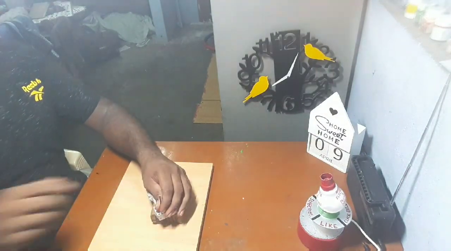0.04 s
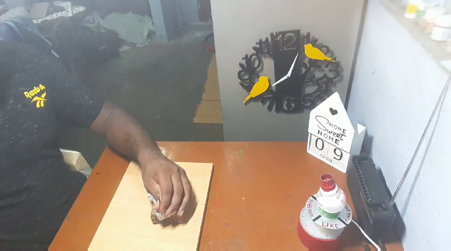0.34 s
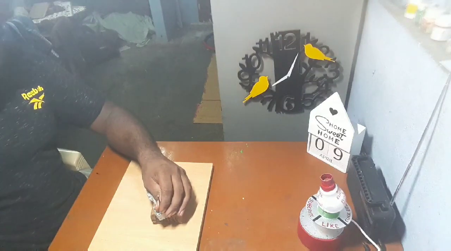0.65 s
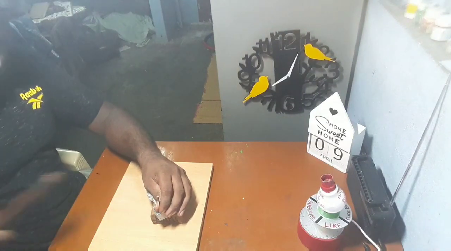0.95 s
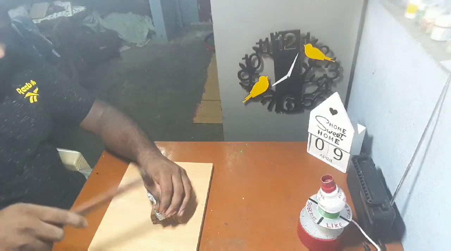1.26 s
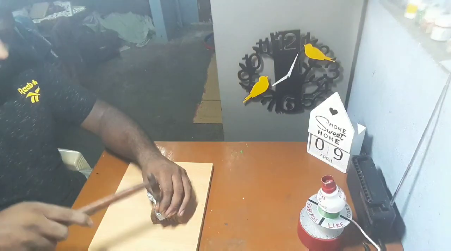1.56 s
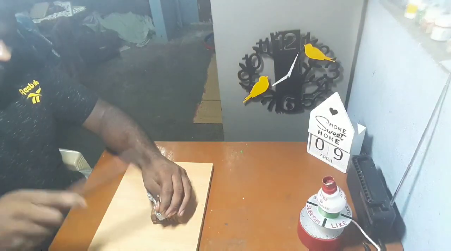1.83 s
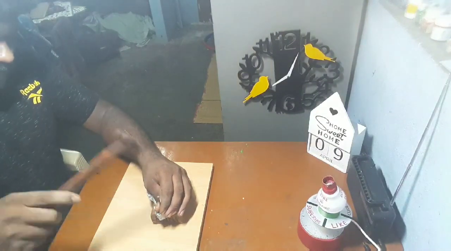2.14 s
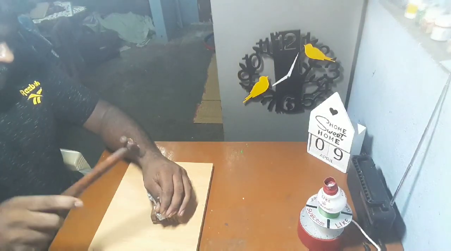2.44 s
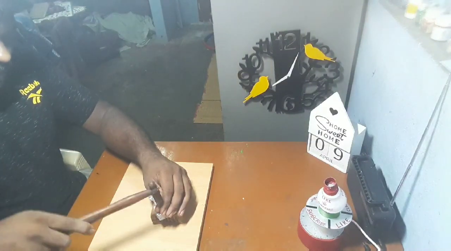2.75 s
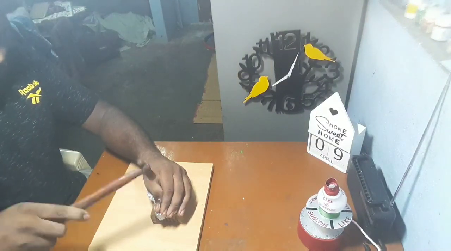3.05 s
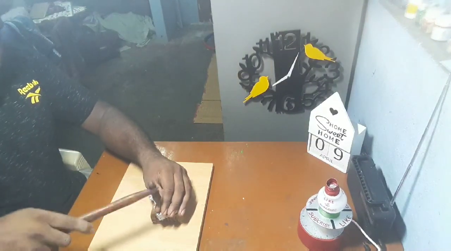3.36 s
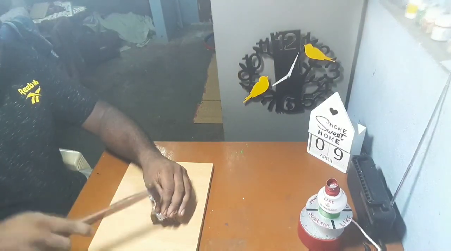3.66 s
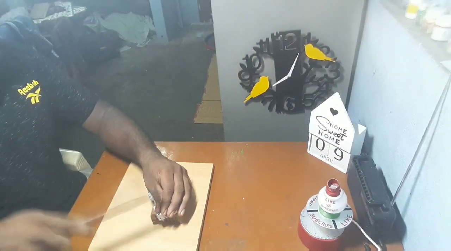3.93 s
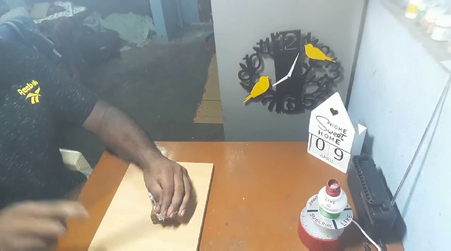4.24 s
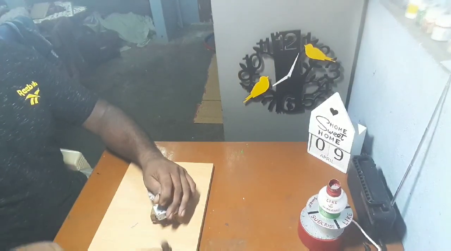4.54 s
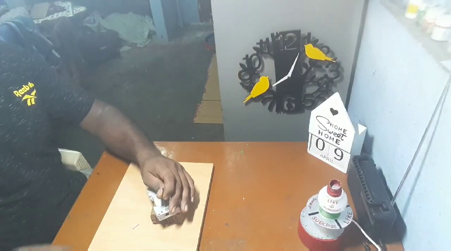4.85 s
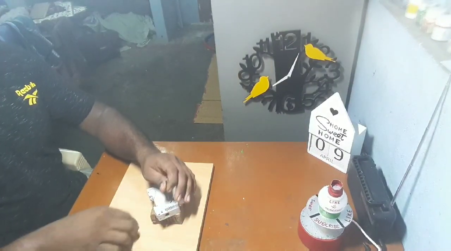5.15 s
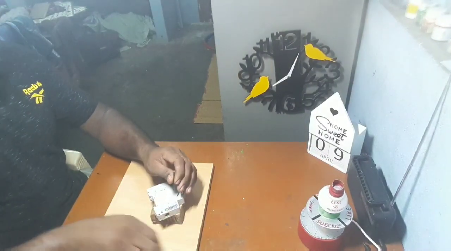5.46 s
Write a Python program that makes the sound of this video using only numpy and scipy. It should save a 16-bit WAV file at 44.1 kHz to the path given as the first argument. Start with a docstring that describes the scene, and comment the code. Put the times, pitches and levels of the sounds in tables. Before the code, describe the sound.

A fan hisses steadily with a faint hum in a small room. At about 0.8 seconds a far horn gives one very brief toot. From 1.9 to 4.3 seconds a tool handle knocks eleven times, about four a second, on a plastic circuit breaker held on a wooden board on a table. Each close blow is a sharp crack with a hollow ring, a small rattle of the insides, a low table thud and a short room echo. The last few hit a little harder and rattle more. The fan's hiss sinks as the knocks begin and stays low to the end. Around 5 seconds the breaker is laid over with three quick, dull bumps. From 5.2 to 5.3 seconds it judders across the board in tiny creaking scrapes, followed by a soft rub of hand and plastic on wood until about 5.6 seconds.

```python
"""A tool handle knocks eleven times on a plastic circuit breaker held on a board on a table.
Each blow cracks, rings the case, rattles its insides and thuds the table, and the small room echoes.
Then the breaker is laid over and judders across the board while the hand rubs along.
A fan hisses throughout, and a far horn toots once before the knocks. An automatic volume control
turns down at the knocks and stays down, so the fan's hiss sinks away."""
import sys
import numpy as np
from scipy import signal
from scipy.fft import rfft, irfft, next_fast_len
from scipy.io import wavfile
from scipy.ndimage import uniform_filter1d

SR = 44100
rng = np.random.default_rng(int(sys.argv[2]) if len(sys.argv) > 2 else 0)


def master_out(mix):
    """Clip the mix to full scale and print it as 16-bit PCM to the path in sys.argv[1]."""
    frames = np.transpose(np.atleast_2d(mix))
    ceiling = np.clip(frames, -1, 1)
    pcm = np.round(ceiling * 32767).astype(np.int16)
    wavfile.write(sys.argv[1], SR, pcm)


N = 250973
TIME = np.arange(N) / SR
AGE = TIME[:SR // 2]  # seconds since a contact, for sounds half a second long

# the tool's blows: (time [s], level [dB], spot [0 = stiff rim, 1 = hollow middle], bass boost [dB])
KNOCKS = [(1.878, -27.5, 0.76, -1.5), (2.1036, -23, 0.64, -1), (2.3571, -21.5, 0.049, 1.5),
          (2.6108, -23, 0.092, 0), (2.8535, -25.5, 0.36, 2), (3.075, -27, 0.63, 4.5),
          (3.2728, -24.5, 0.69, 2.5), (3.4713, -23, 0.78, 2), (3.6965, -20.5, 0.87, 2),
          (4.0138, -19, 0.53, 4), (4.2892, -20, 0.6, -5.5)]
# fingers clicking on the breaker, then the breaker being turned and laid down: (time [s], level [dB])
BUMP_EVENTS = [(4.763, -52), (4.85, -58), (4.885, -58), (4.975, -24.5), (5.068, -23), (5.0962, -24),
               (5.142, -44.5)]
# slips as it is pushed over the board: (time [s])
SLIP_TIMES = [5.2298, 5.2694, 5.2933, 5.318]
# the notes of the knocked case: (pitch [Hz], width [Hz], level [dB]); wider notes die sooner
CASE_NOTES = [(472, 330, 3), (743, 92, 8.5), (994, 27, 2), (1094, 74, 5), (1555, 92, 3), (1782, 132, 4.5),
              (2086, 170, -4.5), (2560, 120, -29), (3690, 260, -26), (7020, 1800, -13.5)]
# the notes of the board: (pitch [Hz], width [Hz], level [dB])
BOARD_NOTES = [(440, 580, 17.5), (650, 540, -11), (950, 33, 1), (1280, 370, 17), (2040, 86, 17),
               (2630, 460, -8), (2950, 300, -29), (3400, 250, -25), (5030, 200, -27)]
# the notes of the creaking case: (pitch [Hz], width [Hz], level [dB])
CREAK_NOTES = [(940, 107, 7), (1260, 54, -13), (1850, 190, 3), (2620, 53, 2.5), (2810, 180, -7),
               (3745, 120, 0), (4730, 180, -20.5), (5400, 140, -17.5), (7150, 130, -24)]
# the low notes of the table top: (pitch [Hz], level [dB], time to fade by 60 dB [s])
TABLE_NOTES = [(70.2, -7, 0.29), (99.4, 5, 0.17), (130.8, -13, 0.31), (178.6, -1, 0.15), (259, 0, 0.11),
               (292.5, -3.5, 0.15), (332, -14.5, .16), (422.4, -10, 0.13)]
# the tone of a bare, hard contact: (frequency [Hz], level [dB])
CRACK_TONE = [(60, -16.5), (250, 7), (500, 1), (780, 0), (1200, -3), (2100, -6), (3000, -10), (4000, -16.5),
              (5000, -19), (7000, -15.5), (8700, -38), (12500, -29), (15300, -46)]
# the case's halves and insides chattering: (frequency [Hz], level [dB])
CHATTER_TONE = [(300, -19), (1300, -1), (2200, 1.5), (3200, -6.5), (5000, -21), (6900, -9), (8700, -30),
                (15000, -28)]
# grit under the case's edges: (frequency [Hz], level [dB])
GRIT_TONE = [(100, -3), (600, 7), (1500, -1.5), (3000, -5.5), (5000, -14), (7000, -24), (10000, -22),
             (15000, -22)]
# the hand rubbing over the board: (frequency [Hz], level [dB])
RUB_TONE = [(30, -10), (90, 17), (400, 13), (1000, 8.5), (2500, -1), (7000, -68), (15000, -43.5)]
# the room's echo: (frequency [Hz], time to fade by 60 dB [s], level [dB])
ROOM_ECHO = [(80, 0.55, -19.5), (247, 0.29, -4), (600, 0.25, 8), (1470, 0.28, 0), (3500, .26, 1.5),
             (7100, 0.26, -1.5), (14000, 0.25, 0)]
# the rush of fan and room air: (frequency [Hz], level [dB])
AIR_TONE = [(15, -29), (25, 5.5), (55, -13), (92, -4.5), (141, -11.5), (285, -6), (344, -12), (416, -8),
            (489, -14), (575, -7), (988, -11), (1070, -11.5), (2990, -23), (11300, -57), (16000, -61)]
# the fan's faint hum: (pitch [Hz], level [dB])
FAN_NOTES = [(87, -47.5), (288, -49), (424, -71), (721, -67)]
# the far horn: (pitch [Hz], level [dB])
HORN_NOTES = [(385, -31.5), (527, -33)]


def gain(db):
    """Turn decibels into a number to multiply by."""
    return 10 ** (np.asarray(db) / 20)


def unit_energy(x):
    """Scale a short sound to an energy of one (amplitude squared times seconds)."""
    return x / np.sqrt(np.sum(x ** 2) / SR)


def fade(fade_s):
    """A curve that falls by 60 dB every fade_s seconds."""
    return np.exp(-np.log(1000) * AGE / fade_s)


def add(track, start_s, sound):
    """Mix a sound into the track."""
    i = int(start_s * SR)
    track[i:i + len(sound)] += sound[:N - i]


def colour(x, tone):
    """Filter a sound to follow a list of (frequency [Hz], level [dB]) points."""
    size = 2 * next_fast_len(len(x))
    hz, db = np.transpose(tone)
    curve = gain(np.interp(np.log(np.fft.rfftfreq(size, 1 / SR) + 1), np.log(hz), db))
    # folding the cepstrum keeps the filter from ringing before the sound starts
    cepstrum = irfft(np.log(curve))
    cepstrum[1:size // 2] *= 2
    cepstrum[size // 2 + 1:] = 0
    return irfft(rfft(x, size) * np.exp(rfft(cepstrum)))[:len(x)]


def soften(x, top_hz):
    """Cut the treble: a softer contact pushes for longer."""
    return signal.sosfilt(signal.butter(2, min(top_hz, SR / 2 - 1), fs=SR, output="sos"), x)


def wander(per_s):
    """A random drift, about one in size, that heads for a new value per_s times a second."""
    points = rng.standard_normal(int(N / SR * per_s) + 2)
    return np.interp(TIME * per_s, np.arange(len(points)), points) * np.sqrt(3 / 2)


def note(hz, db):
    """A pure tone that follows a changing pitch."""
    return gain(db) * np.sqrt(2) * np.sin(2 * np.pi * np.cumsum(hz) / SR)


def fan(air_db=-34.5, flutter_db=0.07, drift_hz=3, waver_db=4.4):
    """Rushing air that flutters slightly, with a few wavering tones."""
    air = colour(rng.standard_normal(N), AIR_TONE) * gain(flutter_db * wander(per_s=17))
    hum = sum(note(hz + drift_hz * wander(per_s=31), db) * gain(waver_db * wander(per_s=15))
              for hz, db in FAN_NOTES)
    return gain(air_db) * air / np.std(air) + hum


def horn(start_s=0.789, end_s=0.862, ramp_s=0.012):
    """One brief, wavering two-note toot from outside."""
    on_off = np.clip(np.minimum(TIME - start_s, end_s - TIME) / ramp_s, 0, 1)
    return on_off * sum(note(hz * (1 + .03 * wander(per_s=50)), db) for hz, db in HORN_NOTES)


def room(x, near_db=2, near_fade_s=0.043):
    """Quick echoes off the table, then the room's tail, drawn afresh for each sound."""
    hz, fade_s, db = np.transpose(ROOM_ECHO)
    freq = np.fft.rfftfreq(len(AGE), 1 / SR)
    build_up = np.minimum(AGE / .002, 1) ** 2
    echo = 0
    for centre_hz in 62.5 * 2 ** np.arange(9):
        octave = abs(np.log2(freq / centre_hz + 1e-9)) < .5
        noise = irfft(np.exp(2j * np.pi * rng.random(len(freq))) * octave, len(AGE))
        tail_s = np.interp(np.log(centre_hz), np.log(hz), fade_s)
        tail_db = np.interp(np.log(centre_hz), np.log(hz), db)
        tail = unit_energy(noise * build_up * (fade(tail_s) + gain(near_db) * fade(near_fade_s)))
        echo = echo + gain(tail_db) * tail * np.sqrt(octave.mean() / SR)
    return signal.fftconvolve(x, echo)[:len(x)]


def rub(start_s=5.334, rise_s=0.044, start_db=-41.5, swell_db_per_s=27):
    """Skin and plastic slide softly on wood, harder as the hand speeds up."""
    noise = colour(rng.standard_normal(N), RUB_TONE)
    age = np.maximum(TIME - start_s, 0)
    level_db = start_db + swell_db_per_s * age + wander(per_s=33)
    return noise / np.std(noise) * np.minimum(age / rise_s, 1) * gain(level_db)


def strengths(db):
    """Each contact shares its force among the notes a little differently; every other one is flipped."""
    return gain(db + rng.standard_normal(db.shape)) * (-1) ** np.arange(len(db))[:, None]


def ring(notes):
    """After one push, an object rings at its own notes, which die away."""
    hz, width, db = np.transpose(notes)[:, :, None]
    waves = width * strengths(db) * np.exp(-np.pi * width * AGE) * np.sin(2 * np.pi * hz * AGE)
    return unit_energy(waves.sum(axis=0))


def thud(rise_s=0.0052):
    """The table top takes a moment to swing up, then booms; the hand's weight shifts its notes a bit."""
    hz, db, fade_s = np.transpose(TABLE_NOTES)[:, :, None]
    hz = hz * (1 + .015 * rng.standard_normal(hz.shape))
    waves = strengths(db) * fade(fade_s) * np.sin(2 * np.pi * hz * AGE)
    return unit_energy(waves.sum(axis=0) * (1 - np.exp(-AGE / rise_s)))


def rattle(tone, fade_s):
    """A shower of tiny clicks as loose bits settle after a blow."""
    clicks = rng.standard_normal(len(AGE)) * (rng.random(len(AGE)) < .2)
    return unit_energy(colour(clicks * fade(fade_s), tone))


def crack():
    """The bare click of hard things meeting."""
    return unit_energy(colour(1. * (AGE == 0), CRACK_TONE))


def slips(first_db=-31, later_db=-38.5, scrape_s=0.0072, top_hz=4600):
    """Short scrapes make the case creak and nudge the board; the first breaks free and is loudest."""
    out = np.zeros(N)
    for k, start_s in enumerate(SLIP_TIMES):
        scrape = rng.standard_normal(len(AGE)) * np.clip(1.5 - AGE / scrape_s, 0, 1)
        ringing = signal.fftconvolve(scrape, ring(CREAK_NOTES))[:len(AGE)]
        creak = unit_energy(soften(ringing, top_hz))
        nudge = soften(gain(-8) * ring(BOARD_NOTES), top_hz) + gain(-13) * thud()
        add(out, start_s, gain(later_db if k else first_db) * (creak + nudge))
    return out


def bumps(heavy_top_hz=1960, db_per_octave=12):
    """Fingers click on the case, then its edges drop grittily on the board, which rings and passes the blow to
    the table."""
    out = np.zeros(N)
    heaviest_db = max(db for _, db in BUMP_EVENTS)
    for start_s, db in BUMP_EVENTS:
        # heavy drops land flat and dull; light finger clicks on the case sound brighter
        top_hz = heavy_top_hz * 2 ** ((heaviest_db - db) / db_per_octave)
        grit = gain(-3) * rattle(GRIT_TONE, fade_s=0.03)
        blow = gain(-2) * ring(BOARD_NOTES) + gain(-10) * crack() + grit + gain(-12) * thud()
        add(out, start_s, gain(db) * soften(blow, top_hz))
    return out


def knocks(loosen_db_per_s=2.5, echo_db=1):
    """The tool drives the case into the board. The blow echoes in the room; the rattle is added dry."""
    out = np.zeros(N)
    first_s = KNOCKS[0][0]
    for start_s, db, spot, bass_db in KNOCKS:
        chatter = gain(-4) * rattle(CHATTER_TONE, fade_s=0.011)
        settling = gain(-4) * rattle(CRACK_TONE, fade_s=0.059)
        blow = gain(-3) * ring(CASE_NOTES) + gain(-2.5) * crack() + gain(2.5) * thud()
        knock = blow + chatter + settling + gain(echo_db) * room(blow)
        # nearer the middle, the case sounds hollower and its metal insides tick more
        hollow_db = np.interp(spot, [0, 1], [-9, 3])
        tick_db = np.interp(spot, [0, 1], [-14, -1.5])
        tick_db += loosen_db_per_s * (start_s - first_s)  # the insides work loose over time
        # the dip at 800 Hz is the gap between the hollow knock and the shell's snap
        tone = [(130, bass_db), (450, hollow_db), (800, -4), (1200, 0), (3700, 0),
                (7000, tick_db), (12000, tick_db / 2)]
        add(out, start_s, gain(db) * colour(knock, tone))
    return out


def scene(bump_echo_db=-4, slip_echo_db=-3):
    """Knocks, then handling that the hand partly shields from the room, over the steady fan."""
    drops, creaks = bumps(), slips()
    echo = room(gain(bump_echo_db) * drops + gain(slip_echo_db) * creaks)
    return (knocks() + drops + creaks + echo + fan() + horn() + rub())[None]


def volume_control(x, limit_db=-20, max_cut_db=17.5, down_s=0.053, up_s=39, ahead_s=0.022):
    """Looks ahead, turns down a step at each loud sound and comes back up very slowly."""
    hop = SR // 1000
    power = uniform_filter1d(x ** 2, size=SR // 100)[::hop]
    level_db = 10 * np.log10(np.maximum(power, 1e-12))
    cut_db, cuts = 0, []
    for wanted_db in np.clip(level_db - limit_db, 0, max_cut_db):
        cut_db += (wanted_db - cut_db) * hop / SR / (down_s if wanted_db > cut_db else up_s)
        cuts.append(cut_db)
    return x * gain(-np.interp(TIME + ahead_s, TIME[::hop], cuts))


def record(dry, bass_hz=45, top_hz=16000, ceiling=0.8):
    """The microphone loses deep bass; then come volume control, rounded peaks and a steep treble cut."""
    heard = signal.sosfilt(signal.butter(2, bass_hz, "high", fs=SR, output="sos"), dry[0])
    rounded = ceiling * np.tanh(volume_control(heard) / ceiling)
    return signal.sosfilt(signal.ellip(8, .2, 70, top_hz, fs=SR, output="sos"), rounded)[None]


dry = scene()
out = record(dry)
master_out(out)
```